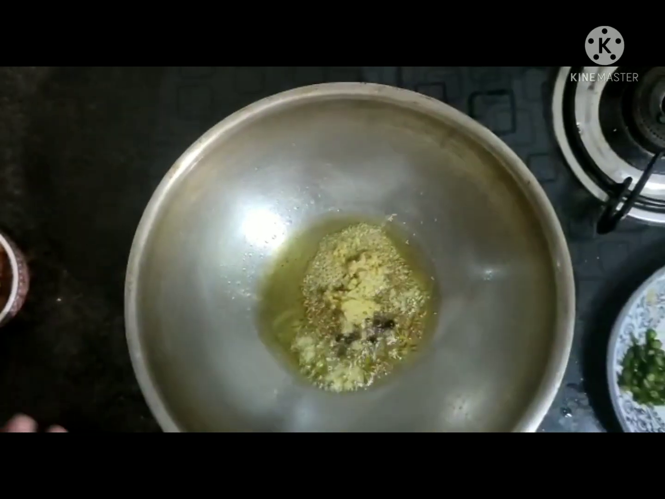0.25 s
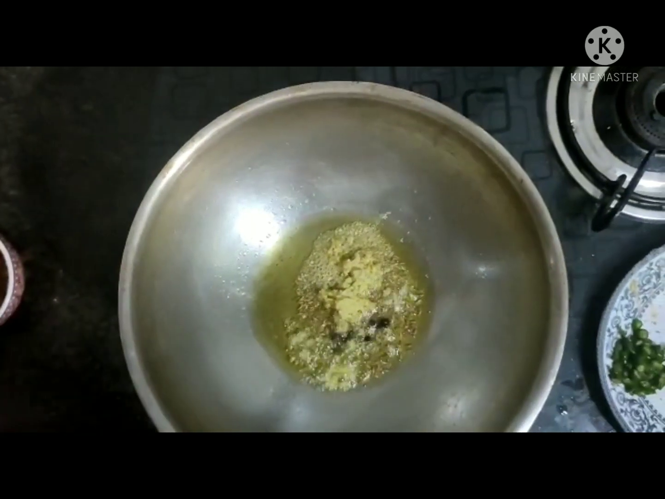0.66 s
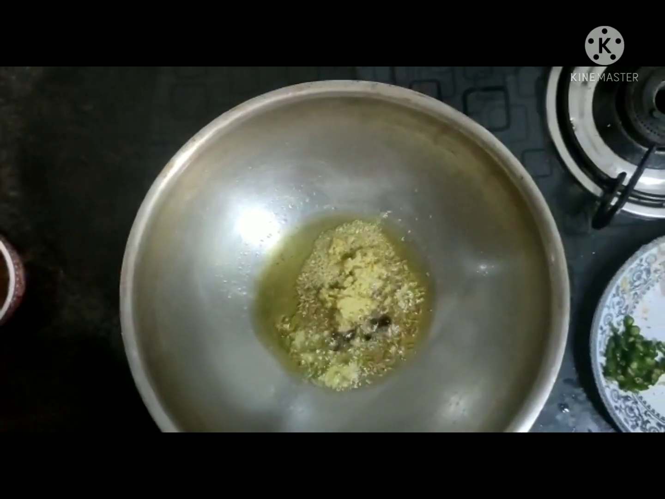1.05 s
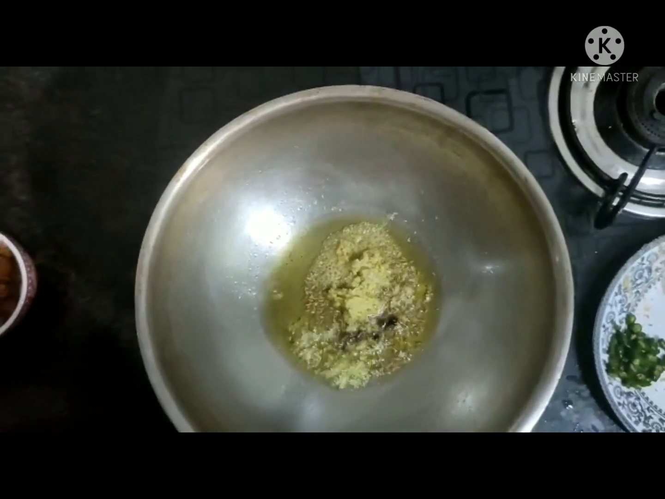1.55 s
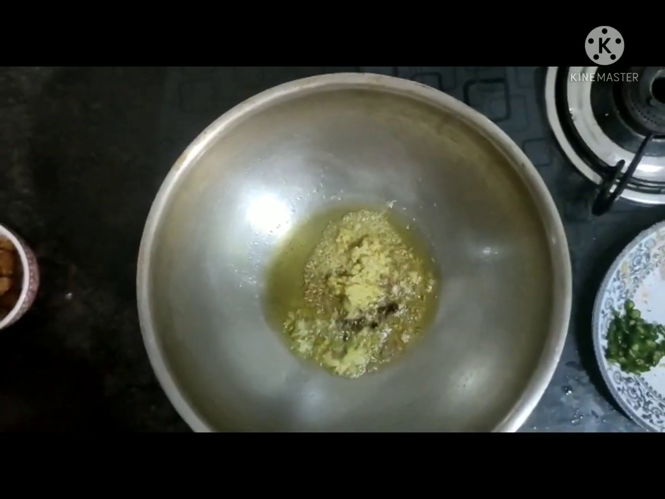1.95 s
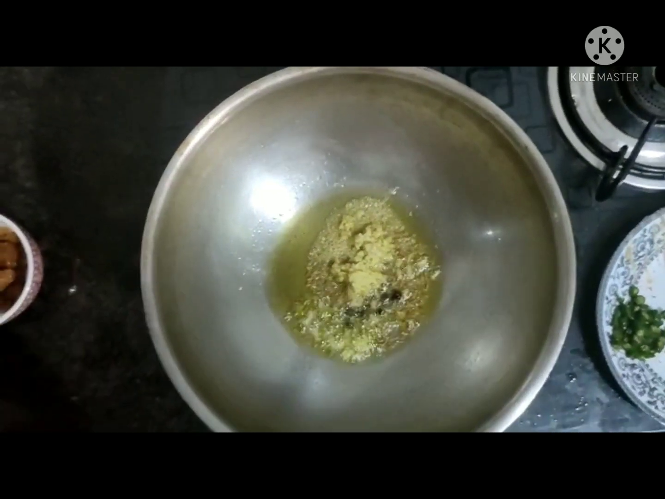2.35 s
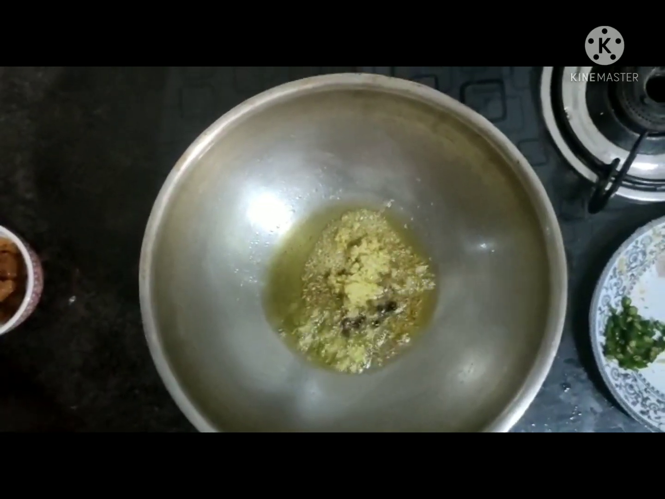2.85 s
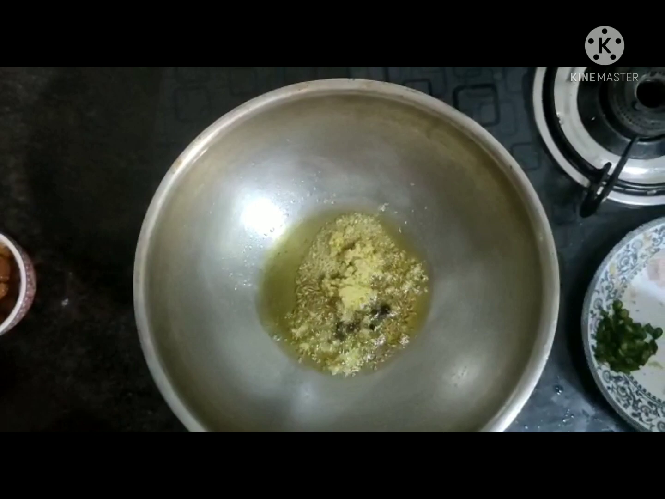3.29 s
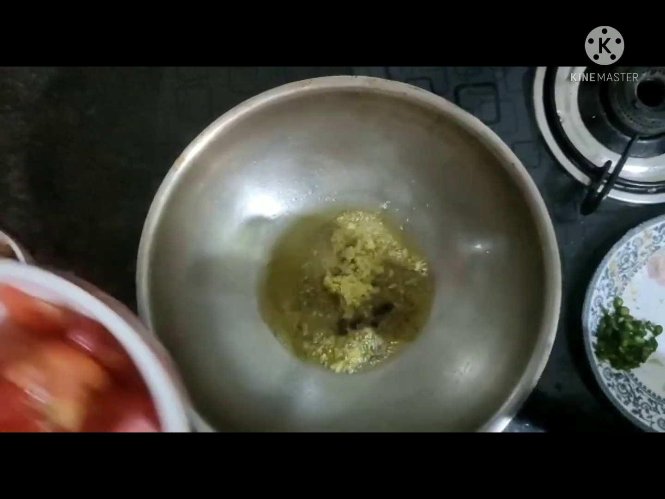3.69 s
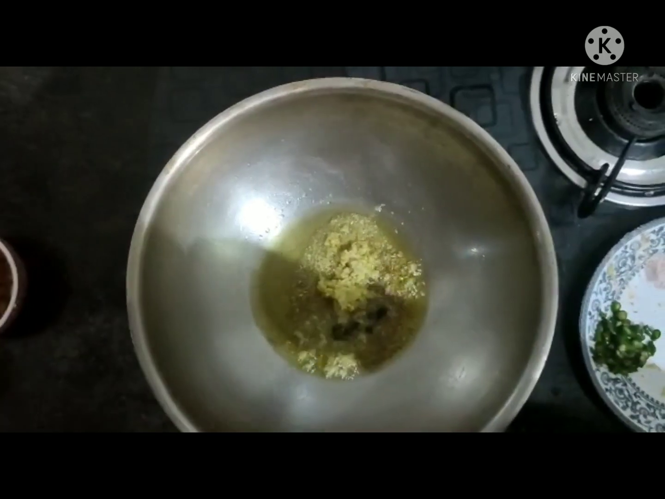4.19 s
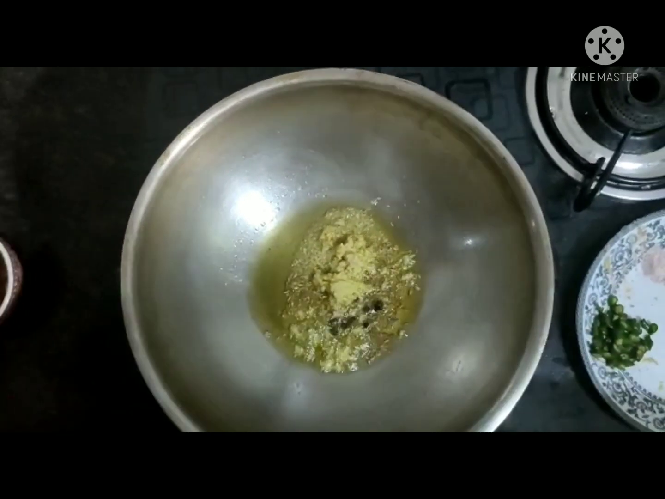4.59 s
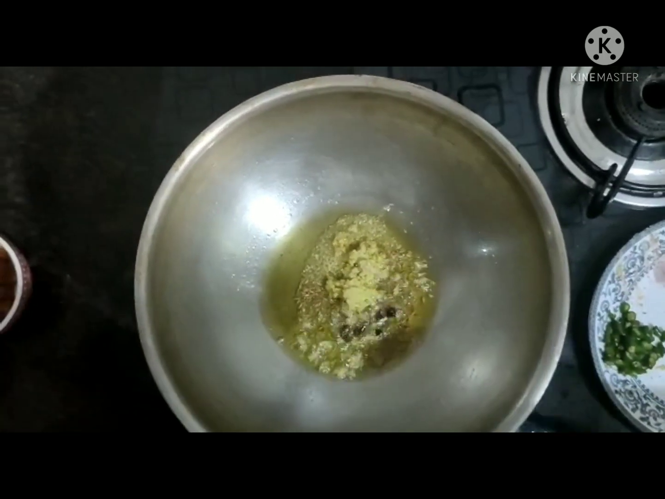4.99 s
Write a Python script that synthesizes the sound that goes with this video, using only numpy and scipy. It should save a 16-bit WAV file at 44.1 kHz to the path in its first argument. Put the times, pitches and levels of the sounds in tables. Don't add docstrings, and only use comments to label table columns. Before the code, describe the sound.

Steady crackling fry in a metal pan slowly calms, broken by snapping oil pops, a plate set down and light dish clinks.

```python
import sys
import numpy as np
from scipy import signal
from scipy.io import wavfile
from scipy.ndimage import uniform_filter1d

SR = 44100
rng = np.random.default_rng(int(sys.argv[2]) if len(sys.argv) > 2 else 0)


def amplitude_ratio(level_db):
    exponent = np.asarray(level_db, float) / 20
    return 10 ** exponent


def put_to_file(sound):
    columns = np.atleast_2d(sound).T
    safe = np.clip(columns, -1, 1)
    whole_steps = np.round(safe * 32767)
    wavfile.write(sys.argv[1], SR, whole_steps.astype(np.int16))


N = 230904
PAN_LAG_SAMPLES = 5

# [t/s, fizz level/dB]
HEAT = [(0.0, -37.5), (0.31, -40.5), (0.57, -39.5), (1.21, -40.5), (1.66, -39.5), (2.01, -39.5),
        (2.25, -41.5), (2.83, -42), (3.14, -42.5), (3.66, -44.5), (4.07, -45), (4.38, -44), (4.78, -47),
        (5.24, -42.5)]
# [t/s, peak/dB]
SPITS = [(0.2547, -12.5), (0.326, -14), (0.459, -12.5), (0.4204, -13), (0.546, -17), (0.62, -16),
         (0.721, -17), (0.7479, -15), (0.9225, -12), (1.041, -12.5), (1.1471, -15.5), (1.1657, -20),
         (1.3518, -16.5), (1.4328, -14), (1.539, -14), (1.597, -16), (1.616, -14.5), (1.8175, -14.5),
         (1.9788, -12), (2.1618, -14.5), (2.5548, -23), (2.6188, -16), (2.8996, -17.5), (3.3182, -15),
         (3.461, -25), (4.2017, -12.5), (4.4203, -36), (4.4339, -15.5), (4.8939, -21), (4.994, -18)]
# [f/Hz, likeness 0..1]
PORT_LIKENESS = [(300, 0.87), (770, 0.73), (1200, 0.27), (1800, 1), (2700, 0.011)]


def evened(x):
    return x / np.sqrt(np.mean(x ** 2) + 1e-20)


def read(points, hz):
    f, value = np.transpose(points)
    return np.interp(np.log(hz + 1), np.log(f + 1), value)


def add(mix, s, sound):
    part = mix[..., round(s * SR):][..., :sound.shape[-1]]
    part += sound[..., :part.shape[-1]]


def band(x, lo_hz, hi_hz, order=2):
    edges_hz = [lo_hz, min(hi_hz, SR / 2 - 500)]
    return signal.sosfilt(signal.butter(order, edges_hz, "bandpass", fs=SR, output="sos"), x)


def later(x, count):
    return np.concatenate([np.zeros(count), x[:-count]])


def causal(points):
    log_gain = np.log(amplitude_ratio(read(points, abs(np.fft.fftfreq(4096, 1 / SR)))))
    return np.fft.ifft(np.exp(np.conj(signal.hilbert(log_gain)))).real[:1024]


def heat_db():
    return np.interp(np.arange(N) / SR, *np.transpose(HEAT))


def fizz(per_s=1700, spread_db=4.5, clump_db=5.0, scatter_t60_s=0.0062, scatter_db=-6, sizes=22):
    tilt_db, tilt_db_per_s = -0.14, 0.08
    clumps = evened(signal.lfilter([1], [1, -np.exp(-1 / (0.0016 * SR))], rng.standard_normal(N)))
    draw, strength, kind = rng.random(N), rng.exponential(1, N), rng.integers(0, sizes, N)
    bursts = amplitude_ratio(spread_db * np.minimum(strength, 2.9) + clump_db * np.clip(clumps, -2, 1.6))
    bursts = bursts * (draw < per_s / SR) * amplitude_ratio(heat_db())
    slope_db = tilt_db + tilt_db_per_s * np.arange(N) / SR
    t, out = np.arange(700) / SR, np.zeros((2, N))
    for k, hz in enumerate(np.geomspace(900, 17000, sizes)):
        octaves = np.log2(hz / 7000)
        grain = np.sin(2 * np.pi * hz * t) * np.exp(-t * hz / 2.15)
        path = amplitude_ratio(scatter_db - 60 * t / scatter_t60_s) * rng.standard_normal((2, len(t))) * 0.36
        path[0, 3 + PAN_LAG_SAMPLES + rng.integers(0, 3)] += 1
        path[1, 3 + rng.integers(0, 3)] += 1
        heard = signal.fftconvolve(path, grain[None] / np.linalg.norm(grain), axes=1) * (hz / 7000) ** 0.57
        train = bursts * amplitude_ratio(slope_db * octaves) * (kind == k)
        out += signal.oaconvolve(train[None], heard, axes=1)[:, :N]
    return out * amplitude_ratio(5.0), bursts


def bubbles_table():
    # [t/s, peak/dB, top/dB re peak, body/dB re peak]
    pops = [(0.197, -21, 5, -25), (0.3919, -9.5, -37, -11.5), (0.5086, -25, 0, 9.5),
            (0.6678, -11, -11, -9.5), (0.7814, -14.5, -8, -14.5), (0.9208, -15, -3, -15),
            (1.277, -32, 0, 3), (1.3139, -25, 7, -37), (1.6357, -14.5, 2, -16), (1.6494, -8, -10, -19),
            (1.8644, -17, -4, -24), (1.9574, -8.5, -8, -35), (2.0967, -0.5, -8.5, -13.5),
            (2.2623, -17.5, -2, -15), (2.455, -9, -5.5, -12.5), (2.6833, -14, -9, -21),
            (2.8477, -20, -7, -9), (3.0973, -29, 4, -15), (3.136, -17, -1, -19), (3.34, -18, 1, -28),
            (3.3487, -24, 4, -34), (3.5062, -26, 6.5, -11), (3.5846, -14, -7, -20),
            (3.754, -23.5, 2.5, -6.5), (4.5225, -14, -7, -15), (4.6995, -22, -13, -10.5),
            (4.7721, -20, 0, -11), (4.887, -22, -1.5, -4.5), (5.1254, -29, -13, 2.5),
            (5.205, -22.5, 0.5, -6)]
    spit_crack_db, spit_top_db, spit_body_db = -3.5, -15, -18.5
    stray_gap_s, stray_spread_db = 0.08, 6
    stray_db, stray_top_db, stray_body_db = 18, -14, -24.5
    spit_rows = [(at, db + spit_crack_db, spit_top_db, spit_body_db) for at, db in SPITS]
    slots = np.arange(0, N / SR - stray_gap_s, stray_gap_s)
    s = slots + stray_gap_s * rng.random(len(slots))
    luck_db = stray_spread_db * np.clip(rng.standard_normal((len(slots), 3)), -2, 1)
    peak_db = np.interp(s, *np.transpose(HEAT)) + stray_db
    usual_db = np.transpose([peak_db, stray_top_db + 0 * s, stray_body_db + 0 * s])
    return pops + spit_rows + list(np.column_stack([s, usual_db + luck_db]))


def spits():
    spatter_t60_s, body_t60_s = 0.034, 0.016
    body, middle, top = np.zeros((3, 2, N))
    t, rows = np.arange(2500) / SR, bubbles_table()
    body_decay = amplitude_ratio(-60 * t * (1 / body_t60_s - 1 / spatter_t60_s))
    for (s, db, top_db, body_db), noise in zip(rows, rng.standard_normal((len(rows), 2, 2500))):
        burst = noise * (0.18 * amplitude_ratio(-60 * t / 0.006) + 0.1 * amplitude_ratio(-60 * t / spatter_t60_s))
        burst *= np.clip(t / 0.00073, 0, 1)
        burst[0, 20 + PAN_LAG_SAMPLES] += 1
        burst[1, 20] += 1
        add(middle, s, burst * amplitude_ratio(db + 7.5))
        add(top, s, burst * amplitude_ratio(db + top_db + 13.0))
        shared = 0.68 * burst + 0.31 * burst[::-1]
        add(body, s, shared * body_decay * amplitude_ratio(db + body_db + 24))
    low = band(band(body, 230, 1720, order=1), 250, 3800)
    return low + band(middle, 4070, 7000) + band(top, 11500, 24000)


def swells():
    level_db, rise_s, fall_s = -13, 0.0046, 0.0067
    out, t = np.zeros((2, N)), np.arange(-1200, 1200) / SR
    rush = np.exp(np.where(t < 0, t / rise_s, -t / fall_s))
    for (s, db), luck in zip(SPITS, rng.standard_normal((len(SPITS), 3, len(t)))):
        crowd_db = 3.1 * evened(uniform_filter1d(luck[2], size=30))
        add(out, s + t[0], amplitude_ratio(db + level_db + crowd_db) * rush * luck[:2])
    return band(out, 4040, 8600)


def squeaks():
    # [t/s, peak/dB, f/Hz, length/s]
    jets = [(1.57, -19.5, 6910, 0.0011), (1.7406, -24, 6670, 0.007), (2.636, -28, 6500, 0.005),
            (2.6833, -34, 7200, 0.0025), (2.948, -21, 6200, 0.0039), (4.2009, -38, 6800, 0.0036),
            (4.21, -18, 6240, 0.0032), (4.3625, -30.5, 6970, 0.0066), (4.4209, -26, 7220, 0.0027),
            (4.986, -24.5, 6740, 0.003), (4.995, -34, 6760, 0.0027)]
    out, t = np.zeros(N), np.arange(900) / SR
    for (s, db, hz, length_s), luck in zip(jets, rng.standard_normal((len(jets), 900))):
        wobble = 1 + 0.23 * uniform_filter1d(luck, size=40)
        whistle = np.sin(2 * np.pi * np.cumsum(hz * wobble) / SR)
        puff = (t / length_s) * np.exp(1 - t / length_s * 2) * 2
        add(out, s, amplitude_ratio(db - 7.0) * whistle * puff)
    return np.array([later(out, count=PAN_LAG_SAMPLES), out])


def pan_ring(bursts):
    # [f/Hz, width/Hz, level/dB]
    pan_modes = [(833, 68, -11), (1261.6, 15, -7.5), (1483, 14, -7), (2193, 20, -7), (2330, 27, -14),
                 (3520, 94, -6)]
    out = np.zeros((2, N))
    for hz, width_hz, db in pan_modes:
        r, turn = np.exp(-np.pi * width_hz / SR), 2 * np.pi * hz / SR
        mode = signal.lfilter([1 - r], [1, -2 * r * np.cos(turn), r * r], bursts - bursts.mean())
        out += amplitude_ratio(db) * mode * np.sin(turn)
    return out * amplitude_ratio(28.5)


def knocks(hits, modes, crack_db, clatter_db, level_db):
    t, out = np.arange(SR // 3) / SR, np.zeros(N)
    count = len(modes)
    hz, mode_db, t60_s = np.transpose(modes)[:, :, None]
    for (s, db, free), luck in zip(hits, rng.standard_normal((len(hits), count + len(t)))):
        mode_luck, noise = luck[:count, None], luck[count:]
        aged = t / np.clip(free, .1, 2)
        ring = amplitude_ratio(mode_db + 0.84 * mode_luck - 60 * aged / t60_s) * np.sin(2 * np.pi * hz * t)
        ring *= 1 + 2.44 * uniform_filter1d(noise, size=150)
        chatter = amplitude_ratio(crack_db) * np.exp(-t / 0.00021) + amplitude_ratio(clatter_db - 60 * aged / 0.029)
        blow = ring.sum(0) / np.sqrt(count) + band(noise * chatter, 261, 3660, order=6)
        add(out, s + .0008, amplitude_ratio(db + level_db) * blow)
    return out


def crockery():
    # [t/s, peak/dB, freedom to ring]
    plate_hits = [
        (0.51, -10, 0.3),
        (0.522, -45, 0.7),
        (0.538, -35, 0.56),
        (0.593, -22, 0.56),
        (0.619, -27, 0.51),
        (0.667, -30.5, 1.0),
    ]
    dish_hits = [(0.085, -56, 0.5), (0.392, -19, 0.083), (0.888, -33, 0.66), (0.913, -22.5, 0.48),
                 (0.924, -50, 0.5), (1.032, -24.5, 0.47), (1.044, -51, 0.67), (1.159, -28, 0.37),
                 (1.277, -26.5, 0.44), (1.314, -35, 0.27), (1.435, -28.5, 0.61), (1.481, -46, 0.62),
                 (1.925, -44, 0.37), (2.773, -37, 0.56), (2.847, -53, 0.22), (2.897, -32, 0.63),
                 (2.936, -29, 0.77), (4.699, -44, 0.24), (4.788, -34, 0.2), (4.793, -38, 0.14),
                 (5.124, -30.5, 0.23)]
    cup_hits = [
        (2.493, -16, 0.6),
        (2.502, -29, 0.75),
        (2.513, -48, 1.0),
        (2.529, -54, 0.89),
        (2.555, -33, 0.63),
        (2.573, -54, 0.89),
        (2.598, -34, 0.82),
    ]
    # [f/Hz, level/dB, t60/s]
    plate_modes = [(267, 3, 0.26), (322, -11, 0.16), (416, 4.5, 0.14), (433, 1.5, 0.16), (569, 1, 0.17),
                   (797, -10, 0.14), (988, -5, 0.074), (1095, -6, 0.15), (1270, 2, 0.051),
                   (1370, 4.5, 0.068), (1640, 2, 0.055), (2080, -15, 0.039), (2095, -4.5, 0.12),
                   (2530, -10, 0.063), (3250, -2, 0.1), (3380, -4, .07)]
    dish_modes = [(782.3, -14, 0.76), (1020, -64, 0.15), (1340, -18, 0.11), (1320, 4, 0.02),
                  (2166, 12.5, 0.0073), (3450, -5, 0.052)]
    cup_modes = [(300, -5.5, 0.18), (390, -7, 0.58), (732, 0.5, 0.079), (1060, -14, 0.034),
                 (1250, -8, 0.045), (1370, -10, 0.048), (1530, -7, 0.068), (2030, -7, 0.08),
                 (2170, -5.5, 0.087), (2710, -11, 0.061), (2830, -31, 0.063), (3830, 5.5, 0.048)]
    plate = knocks(plate_hits, plate_modes, crack_db=5.7, clatter_db=0, level_db=4.5)
    dish = knocks(dish_hits, dish_modes, crack_db=8.1, clatter_db=-4.0, level_db=1.5)
    cup = knocks(cup_hits, cup_modes, crack_db=-6, clatter_db=1.5, level_db=4.0)
    return plate + dish + cup


def kitchen(x):
    # [f/Hz, t60/s]
    decay_s = [(300, 0.32), (1000, 0.43), (3000, 0.35), (7000, 0.47), (15000, 0.083)]
    taps, grid = np.zeros((2, SR // 2)), np.arange(200, SR // 2 - 20, 20)
    at = grid + rng.integers(0, 20, (2, len(grid)))
    np.put_along_axis(taps, at, rng.choice([-1., 1.], at.shape), 1)
    hz, t, z = signal.stft(taps, SR, nperseg=256)
    same = np.clip(read(PORT_LIKENESS, hz), 0, 1)[:, None]
    z[1] = same * z[0] + np.sqrt(1 - same ** 2) * z[1]
    tail = signal.istft(z * amplitude_ratio(-60 * t / read(decay_s, hz)[:, None]), SR, nperseg=256)[1]
    return signal.fftconvolve(x[None], tail / np.linalg.norm(tail[0]), axes=1)[:, :N]


def wash_db():
    return -43 - 1.1 * np.arange(N) / SR + 0.15 * (heat_db() - HEAT[0][1])


def wash():
    # [f/Hz, level/dB per Hz]
    hiss_db = [(200, 2), (600, -7), (1200, -15.5), (2500, -8.5), (5000, -1.5), (9000, -12.5), (16000, -4.5)]
    frames, hz = N // 128 + 5, np.fft.rfftfreq(512, 1 / SR)
    a, b, c, d, patches = rng.standard_normal((frames, 257, 5)).T
    patches = evened(uniform_filter1d(uniform_filter1d(patches, 8, 0), 14, 1))
    flicker = evened(uniform_filter1d(rng.standard_normal(frames), 6))
    same = np.clip(read(PORT_LIKENESS, hz), 0, 1)[:, None]
    left = a + 1j * b
    z = np.array([left, same * left + np.sqrt(1 - same ** 2) * (c + 1j * d)])
    z *= amplitude_ratio(read(hiss_db, hz)[:, None] + 1.58 * patches + 1.24 * flicker)
    return amplitude_ratio(wash_db() + 10.0) * evened(signal.istft(z, nperseg=512, noverlap=384)[1][:, :N])


def scene():
    bubbles, bursts = fizz()
    cracks = spits() + swells()
    near = bubbles + cracks + squeaks()
    dishes = crockery()
    into_room = amplitude_ratio(-3.0) * bubbles.mean(0) + amplitude_ratio(-6.0) * cracks.mean(0) + amplitude_ratio(-3.5) * dishes
    far = kitchen(into_room) + wash() + pan_ring(bursts)
    beside = amplitude_ratio(-3.0) * np.array([dishes, later(dishes, count=14)])
    return near + beside + np.array([later(far[0], count=PAN_LAG_SAMPLES), far[1]])


def band_limit(x):
    return signal.sosfilt(signal.butter(12, 16860, fs=SR, output="sos"), x)


def record(dry):
    # [f/Hz, gain/dB]
    left_port = [(300, -9.5), (800, -1.5), (2200, 1), (4200, -4.5), (5100, -8.5), (6000, -1), (6900, 13.5),
                 (7400, 10), (8100, 5), (9300, 2.5), (11200, 4.5), (13500, -1.5), (15200, 5)]
    right_port = [(300, -10.5), (800, -3), (1600, -1), (2200, 4.5), (3600, -3), (4500, -2.5), (5200, -9),
                  (6800, -5), (8800, -1.5), (10300, -6), (12400, -11.5), (14000, -4.5), (15300, -12.5)]
    low_cut_hz, top_hz, rumble_db, rumble_end_s = 287.7, 15560, -54, 0.107
    ports = np.array([signal.oaconvolve(x, causal(p))[:N] for x, p in zip(dry, (left_port, right_port))])
    cut = signal.sosfilt(signal.butter(12, low_cut_hz, "highpass", fs=SR, output="sos"), ports)
    still_open = np.clip((rumble_end_s - np.arange(N) / SR) / .015, 0, 1)
    cut += amplitude_ratio(rumble_db) * evened(band(rng.standard_normal(N), 65, 195)) * still_open
    low_pass = signal.firwin(1023, top_hz, window=("kaiser", 9), fs=SR)
    return band_limit(signal.oaconvolve(cut, low_pass[None], "same"))


dry = scene()
out = record(dry)
put_to_file(out)
```